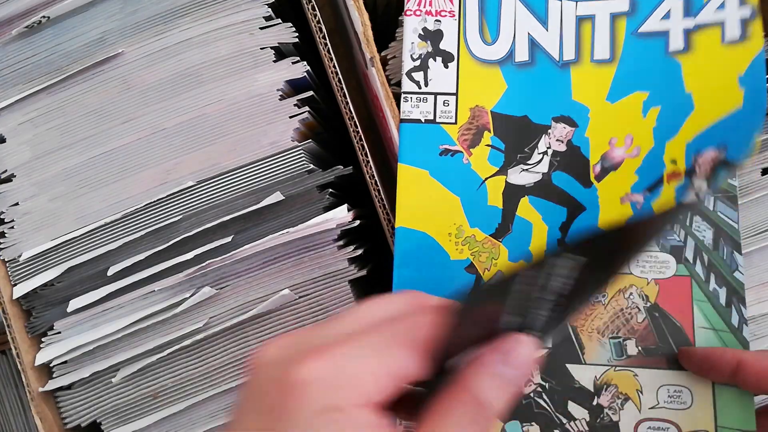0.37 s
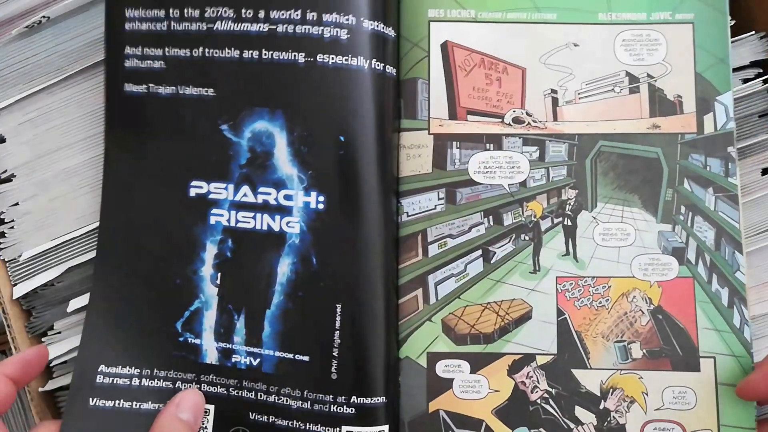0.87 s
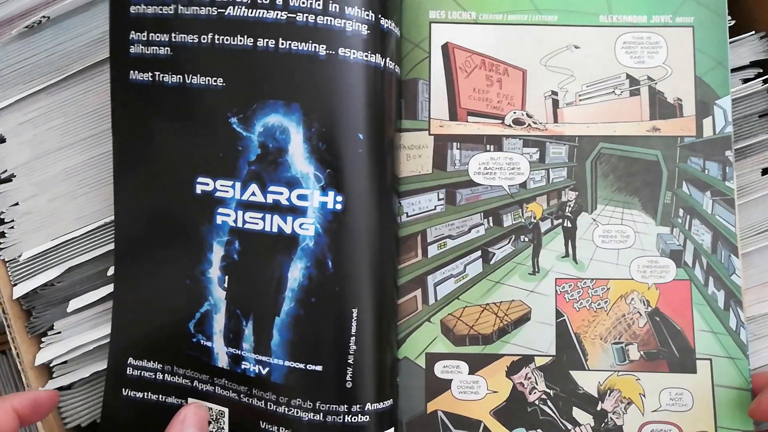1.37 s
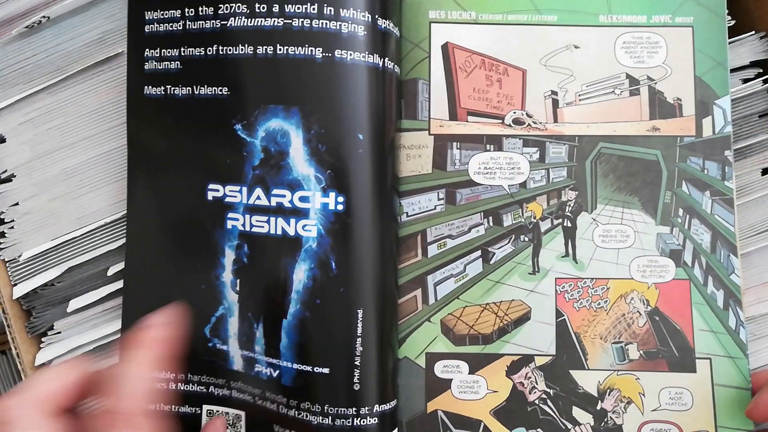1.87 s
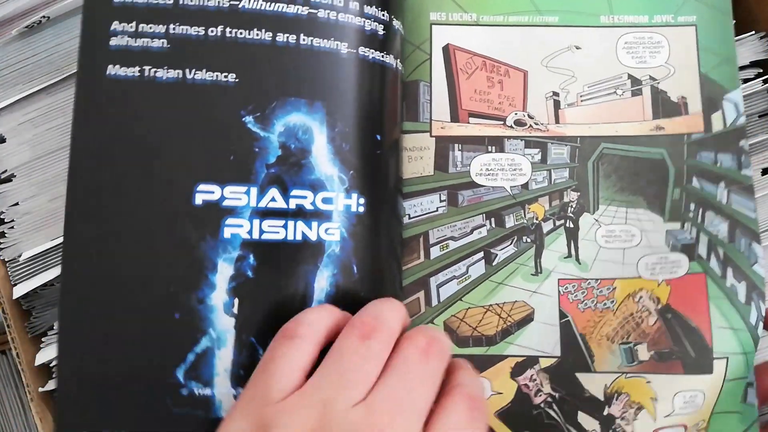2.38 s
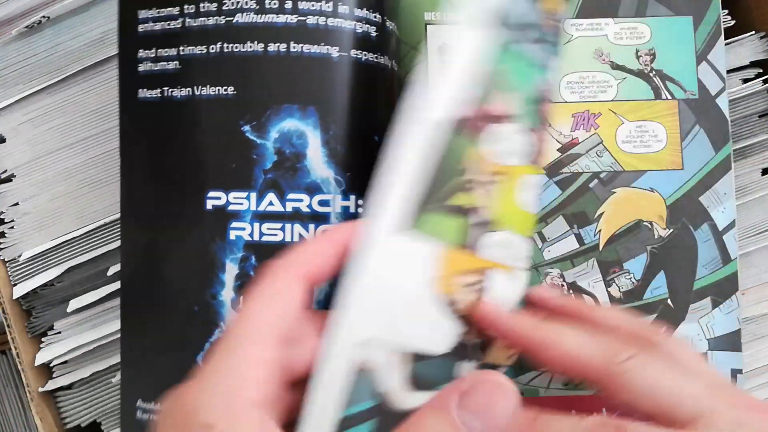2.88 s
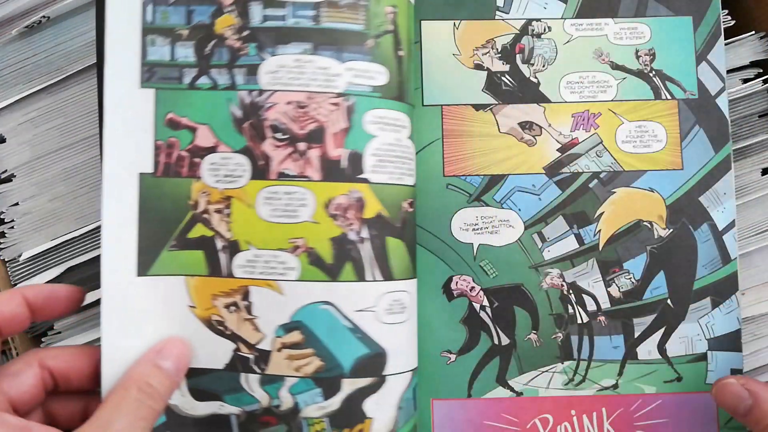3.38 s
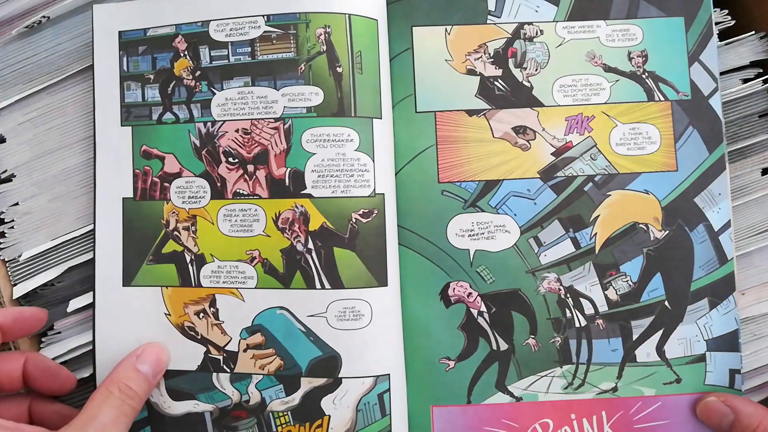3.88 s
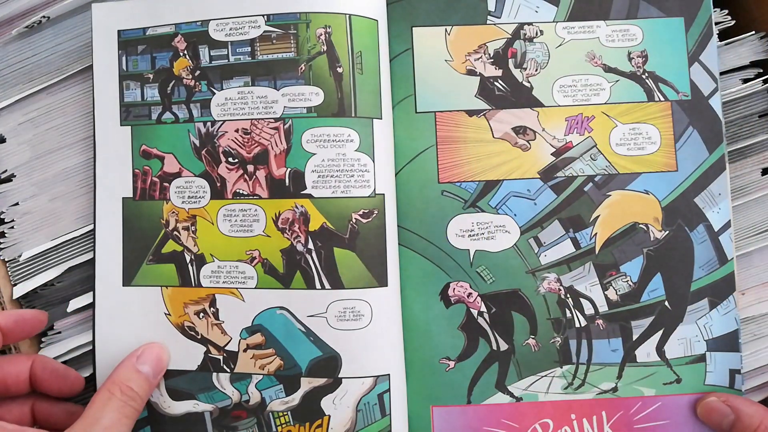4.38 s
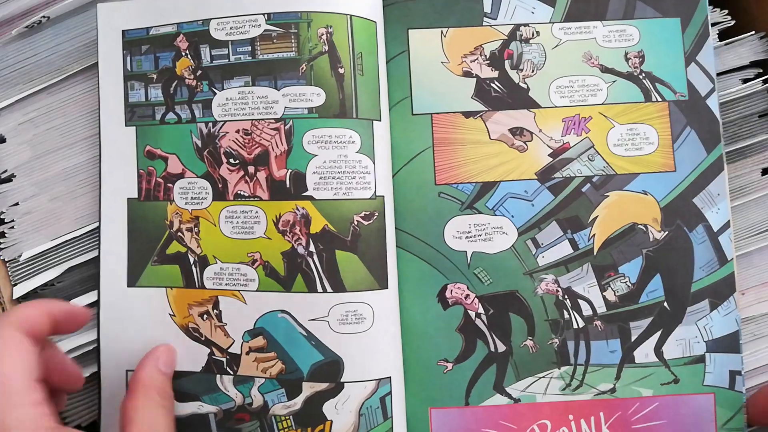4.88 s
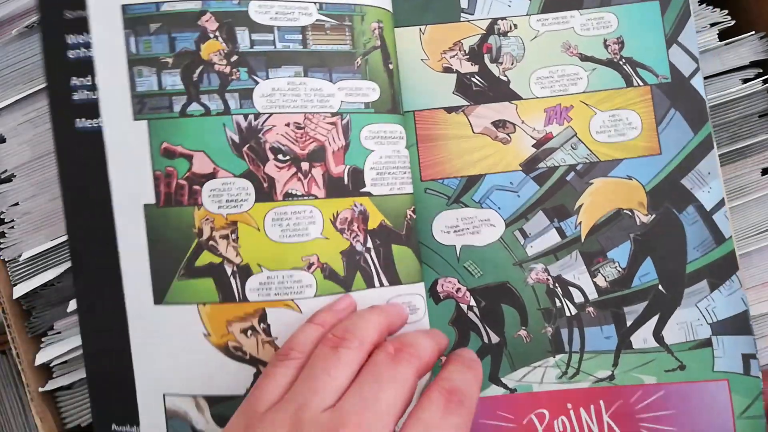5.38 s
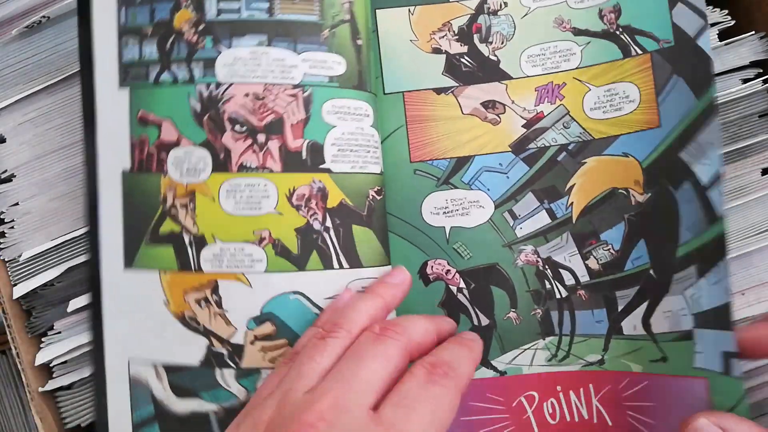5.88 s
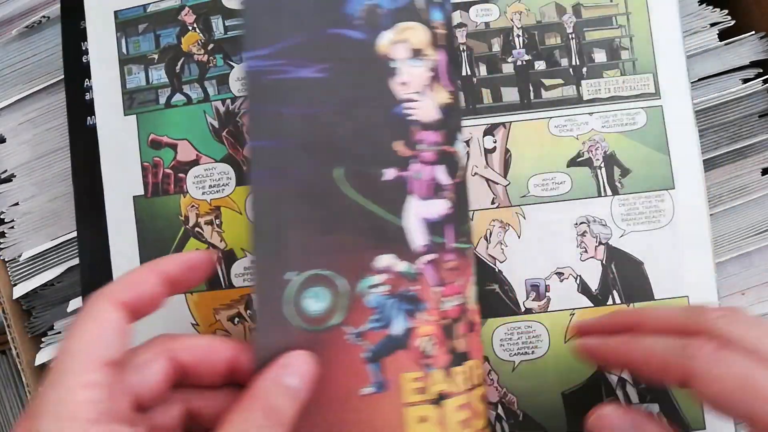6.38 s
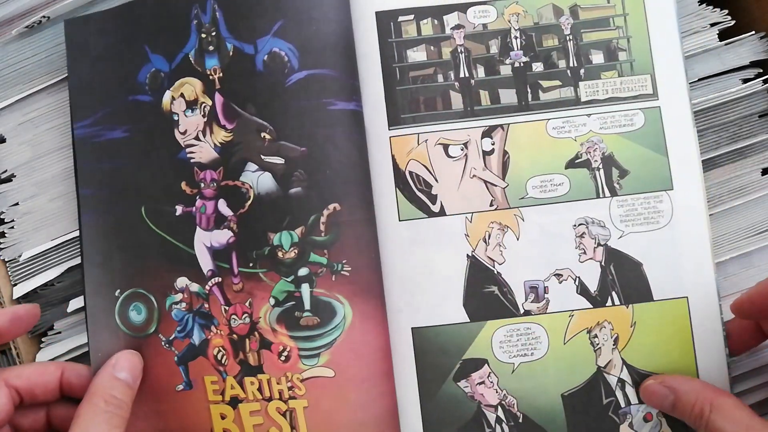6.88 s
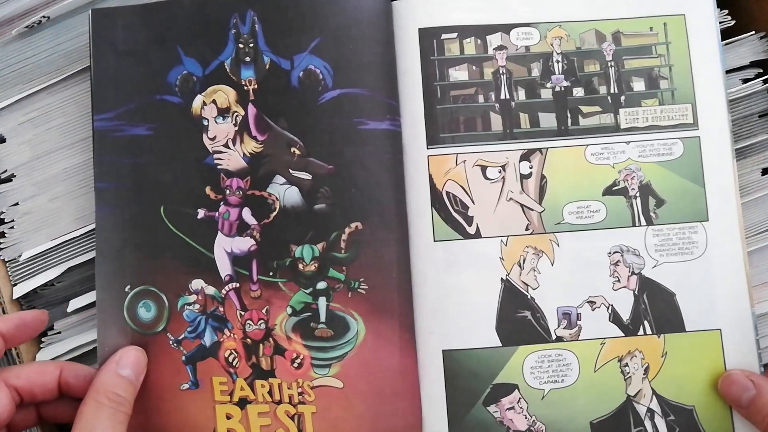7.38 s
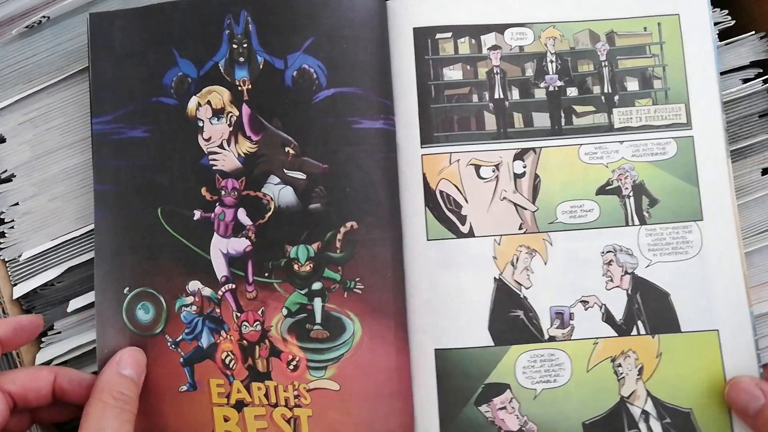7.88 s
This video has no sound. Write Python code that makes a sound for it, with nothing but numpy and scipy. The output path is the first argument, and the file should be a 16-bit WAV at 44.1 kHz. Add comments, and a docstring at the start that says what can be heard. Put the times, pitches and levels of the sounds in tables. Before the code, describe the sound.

Glossy booklet pages are turned by hand close up, with grainy rubbing, crisp creasing snaps and soft bumps, separated by quiet pauses.

```python
"""Paper and fingertips slide with a grainy hiss as hands turn the glossy pages of a thin booklet over a box
of magazines, close under a small stereo microphone. Friction is noise shaped by many tiny random catches.
Creases snap as short noise bursts in three bands, curled edges sing as noise in narrow gliding resonances,
and the booklet bumps the box, heard as decaying modes. A low handling rumble, a short room echo
and the faint steady hush of a quiet room lie around them."""
import sys
import numpy as np
from scipy import signal
from scipy.fft import rfft, irfft, next_fast_len
from scipy.io import wavfile
from scipy.ndimage import uniform_filter1d

SR = 44100
rng = np.random.default_rng(int(sys.argv[2]) if len(sys.argv) > 2 else 0)


def makeup_ratio(level_db):
    """Linear amplitude ratio for a level in decibels (20 dB per factor of ten)."""
    decades = np.asarray(level_db, float) / 20
    return 10 ** decades


def master_out(mix):
    """Clip the mix to full scale and print it as 16-bit PCM to the path in sys.argv[1]."""
    frames = np.transpose(np.atleast_2d(mix))
    ceiling = np.clip(frames, -1, 1)
    pcm = np.round(ceiling * 32767).astype(np.int16)
    wavfile.write(sys.argv[1], SR, pcm)


N = 363384  # samples, 8.24 s


def evened(x):
    """Power normalisation: scales to rms 1."""
    return x / np.sqrt(np.mean(x ** 2) + 1e-20)


def read(points, hz):
    """Logarithmic frequency scale: interpolates a table along it."""
    f, value = np.transpose(points)
    return np.interp(np.log(hz + 1), np.log(f + 1), value)


def coloured(x, tone):
    """Linear filtering: weights the spectrum by a table of levels, then sets the pair to rms 1."""
    size = next_fast_len(N)
    weight = makeup_ratio(read(tone, np.fft.rfftfreq(size, 1 / SR)))
    return evened(irfft(rfft(x, size) * weight, size)[..., :N])


def resonate(x, hz, width):
    """Resonance by heterodyning: shifts the curve hz down to zero, smooths twice, and shifts back."""
    turn = np.exp(2j * np.pi * np.cumsum(hz * np.ones(x.shape[-1])) / SR)
    r = np.exp(-np.pi * width / SR)
    smoothed = signal.lfilter([(1 - r) ** 2], [1, -2 * r, r * r], x / turn)
    return 2 * (turn * smoothed).real


def pair(x, same, lag):
    """Partial coherence: the right port hears a share of the left's sound, lag samples later, plus its own."""
    return np.array([x[0], same * np.roll(x[0], lag) + np.sqrt(1 - same ** 2) * x[1]])


def sides(pan_db):
    """Level difference between ports: left and right gains of constant mean power."""
    g = makeup_ratio([pan_db / 2, -pan_db / 2])
    return g / np.sqrt((g ** 2).mean(0))


def grit(per_s, spread_db, grain_s, smooth, same, lag):
    """Stick-slip friction: tiny catches of uneven size, each a short puff, over a smooth hiss."""
    catches = rng.random(N) < per_s / SR
    size = makeup_ratio(spread_db * np.minimum(rng.exponential(1, N), 5)) * catches
    puffs = signal.lfilter([1], [1, -np.exp(-1 / (grain_s * SR))], size)
    return pair((smooth + evened(puffs)) * rng.standard_normal((2, N)), same, lag)


def mottled(x, depth_db):
    """Changing contact: the colour shifts in random patches, as ever other parts of the sheet touch."""
    z = signal.stft(x, nperseg=256, noverlap=192)[2]
    patches = uniform_filter1d(rng.standard_normal(z.shape[1:]), size=5, axis=0)  # across frequency
    patches = uniform_filter1d(patches, size=24, axis=1)  # across time
    return evened(signal.istft(z * makeup_ratio(depth_db * evened(patches)), nperseg=256, noverlap=192)[1][:, :N])


def swells(peak_s, rise_s, fall_s, db, rest_db):
    """Incoherent addition: gains that rise to a peak and fall away, their powers added to a resting power."""
    t = np.arange(0, N + 32, 32)[:, None] / SR
    away = np.maximum((peak_s - t) / rise_s, (t - peak_s) / fall_s)
    rounded = 1.15  # 1 gives pointed swells, more gives round ones
    power = (makeup_ratio(db - 20 * away ** rounded) ** 2).sum(1) + makeup_ratio(rest_db) ** 2
    return np.interp(np.arange(N) / SR, t[:, 0], np.sqrt(power))


# strokes of finger and page:
# (peak time [s], rise by 20 dB [s], fall by 20 dB [s], rubbing level [dB], bent sheet re rubbing [dB])
STROKES = [(0.034, 0.129, 0.022, -47, 0.8), (0.06, 0.052, 0.165, -49.3, -3.5),
           (0.16, 0.1, 0.08, -45.0, -4.8), (0.225, 0.05, 0.1, -54, -3), (0.295, 0.075, 0.09, -40, -11),
           (0.35, 0.12, 0.075, -51, -3), (0.472, 0.054, 0.299, -50.1, -4.4),
           (0.64, 0.027, 0.067, -40.7, -5.8), (0.721, 0.062, 0.152, -50.9, -2.8),
           (0.9, 0.16, 0.268, -48.8, -2.7), (0.952, 0.004, 0.741, -59.4, -1.4),
           (1.16, 0.05, 0.02, -49.0, 0.0), (1.184, 0.005, 0.05, -46.0, 3.0),
           (1.846, 0.19, 0.258, -54.3, -5.0), (2.103, 0.064, 0.104, -56.7, -10.7),
           (2.22, 0.022, 0.245, -43.4, -3.8), (2.322, 0.066, 0.169, -34.5, -10.5),
           (2.472, 0.139, 0.11, -35.5, -6.2), (2.647, 0.004, 0.194, -43.4, -9.9),
           (2.693, 0.054, 0.066, -46.3, 8.2), (2.792, 0.108, 0.085, -51.2, -1.2),
           (2.925, 0.047, 0.274, -49.9, -8.4), (3.024, 0.097, 0.153, -46.3, -11.0),
           (3.113, 0.078, 0.138, -45.1, -5.7), (3.211, 0.108, 0.093, -53.1, -10.1),
           (3.348, 0.075, 0.14, -46.3, -9.5), (3.48, 0.015, 0.178, -61.1, -5.6),
           (3.63, 0.083, 0.055, -57.0, -2.3), (3.791, 0.12, 0.038, -48.3, -5.3),
           (4.664, 0.122, 0.111, -68.3, -0.7), (4.915, 0.072, 0.124, -56.7, -2.5),
           (5.038, 0.124, 0.016, -53.9, -5.8), (5.148, 0.582, 0.007, -61.2, -2.8),
           (5.198, 0.141, 0.163, -56.6, -4.1), (5.294, 0.064, 0.078, -38.7, -14.8),
           (5.431, 0.238, 0.069, -44.7, -3.9), (5.527, 0.022, 0.062, -39.1, -6.9),
           (5.578, 0.198, 0.035, -43.1, -1.2), (5.669, 0.161, 0.132, -33.6, -7.6),
           (5.714, 0.202, 0.026, -46.4, -20.8), (5.786, 0.021, 0.107, -37.4, -5.0),
           (5.91, 0.141, 0.177, -41.0, -6.3), (5.977, 0.042, 0.011, -41.5, -9.4),
           (6.114, 0.127, 0.084, -43.7, -10.3), (6.321, 0.227, 0.079, -50.2, -7.9),
           (6.347, 0.028, 0.013, -45.1, -17.1), (6.437, 0.028, 0.065, -58.5, -7.6),
           (6.538, 0.073, 0.041, -49.9, -9.4), (6.614, 0.007, 0.166, -53.0, -8.5),
           (6.655, 0.097, 0.099, -53.8, -7.1), (6.803, 0.145, 0.05, -55.0, -5.2),
           (6.878, 0.109, 0.044, -59.0, -1.2), (6.97, 0.07, 0.321, -53.6, -4.1),
           (7.109, 0.25, 0.256, -50.9, -4.5), (7.267, 0.39, 0.043, -58.4, -2.2),
           (7.467, 0.019, 0.64, -69.6, -2.1), (7.979, 0.218, 0.031, -56.0, -3.4),
           (8.038, 0.069, 0.062, -49.7, -6.8), (8.188, 0.082, 0.734, -63.3, -5.6)]
# where the hands work: (time [s], left over right level [dB], brightest frequency of the rub [Hz])
HAND_PATH = [(0.0, -9.0, 7000), (0.07, -5.5, 6960), (0.25, -10.5, 6830), (1.1, -1.0, 7090),
             (1.95, -2.0, 7110), (2.52, -10.0, 6970), (2.75, -2.5, 6640), (2.94, -11.0, 7340),
             (4.01, -0.5, 7070), (5.0, -3.5, 7030), (5.28, -11.5, 7430), (5.51, -4.5, 7020),
             (6.22, -7.5, 7450), (6.29, -11.5, 7360), (6.77, -3.0, 7120), (8.24, -3.0, 7150)]
# colour of the rubbing, peaked by the microphone port: (frequency [Hz], relative density [dB per Hz])
RUB_TONE = [(2650, -54), (4500, -18), (6120, -8), (7180, -7.5), (7900, -6), (10700, -23), (13700, -32),
            (16000, -40)]


def hand_curves():
    """Moving source: the hands' level difference and brightest frequency, interpolated over time."""
    s, *columns = np.transpose(HAND_PATH)
    return [np.interp(np.arange(N) / SR, s, column) for column in columns]


def rubbing():
    """Sliding friction: each stroke drives a grainy hiss with a moving resonance."""
    *when, rub_db, _ = np.transpose(STROKES)
    pan_db, bright_hz = hand_curves()
    hiss = coloured(grit(per_s=1500, spread_db=9.0, grain_s=0.0024, smooth=3.2, same=0.31, lag=-5), RUB_TONE)
    hiss = mottled(hiss + 0.9 * resonate(hiss, bright_hz, width=1640), depth_db=2.7)
    # at rest, fingers hold the pages still
    return swells(*when, rub_db, rest_db=-80) * sides(pan_db) * hiss


# colour of the bent sheet: (frequency [Hz], relative density [dB per Hz])
SHEET_TONE = [(1180, -31.5), (2000, -8.5), (2280, -5), (3090, -1), (3870, -1.5), (5500, -1), (7150, -12),
              (12100, -120)]


def bending():
    """Bending of a thin sheet: the same strokes drive its rustle, a friction noise of lower colour."""
    *when, rub_db, bend_db = np.transpose(STROKES)
    pan_db, _ = hand_curves()
    rustle = grit(per_s=1000, spread_db=1.0, grain_s=0.003, smooth=0.64, same=0.41, lag=11)
    sheet = mottled(coloured(rustle, SHEET_TONE), depth_db=1.36)
    return swells(*when, rub_db + bend_db, rest_db=-83) * sides(0.7 * pan_db) * sheet


# colour of the flexing page: (frequency [Hz], relative density [dB per Hz])
FLEX_TONE = [(260, -61), (450, -38), (599, -16), (1070, -6), (1570, -8), (2000, -6), (2280, -14),
             (2600, -10), (3380, -42), (5720, -120)]
# the page buckles and flaps: (peak time [s], rise by 20 dB [s], fall by 20 dB [s], level [dB])
FLAPS = [(0.012, 0.025, 0.255, -60.1), (0.177, 0.033, 0.574, -57.7), (0.633, 0.032, 0.19, -55.3),
         (0.798, 0.035, 0.091, -52.2), (0.917, 0.123, 0.133, -56.0), (1.18, 0.006, 0.047, -42.0),
         (2.1, 0.123, 0.047, -64.8), (2.205, 0.071, 0.021, -56.3), (2.519, 0.106, 0.089, -50.7),
         (2.689, 0.03, 0.062, -36.1), (2.789, 0.032, 0.046, -49.3), (2.915, 0.049, 0.381, -60.2),
         (3.084, 0.032, 0.126, -53.7), (3.572, 0.204, 0.688, -67.4), (3.828, 0.341, 0.029, -64.4),
         (5.072, 0.224, 0.041, -61.5), (5.129, 0.044, 0.039, -62.2), (5.405, 0.202, 0.172, -53.0),
         (5.531, 0.007, 0.521, -59.7), (5.878, 0.252, 0.026, -49.0), (6.008, 0.05, 0.023, -55.0),
         (6.193, 0.321, 0.06, -61.7), (6.323, 0.012, 0.296, -63.7), (7.145, 0.024, 0.267, -59.0),
         (7.248, 0.048, 0.031, -54.6), (8.045, 0.225, 0.117, -61.2)]


def flexing():
    """Flexure of a page: strokes and flaps add in power to drive a low, lumpy noise."""
    *when, rub_db, bend_db = np.transpose(STROKES)
    pan_db, _ = hand_curves()
    lumps = grit(per_s=250, spread_db=4.7, grain_s=0.0048, smooth=0.83, same=0.45, lag=2)
    flex = mottled(coloured(lumps, FLEX_TONE), depth_db=2.8)
    stroke_db = rub_db - 13 + 1.2 * np.minimum(bend_db, 0)  # a weaker bend flexes the page less
    level = np.hypot(swells(*when, stroke_db, rest_db=-85), swells(*np.transpose(FLAPS), rest_db=-85))
    return level * sides(0.24 * pan_db) * flex  # lower sound bends round to both ports


# the hand shifts the pile and fans air: (peak time [s], rise by 20 dB [s], fall by 20 dB [s], level [dB])
SHIFTS = [(0.68, 0.3, 1.0, -67), (1.84, 0.04, 0.16, -63), (2.12, 0.16, 0.14, -58), (2.55, 0.25, 0.6, -64),
          (2.74, 0.3, 0.1, -66), (3.14, 0.16, 0.11, -60), (3.72, 0.6, 0.12, -73), (5.09, 0.06, 0.06, -54),
          (5.28, 0.12, 0.28, -63), (5.85, 0.45, 0.35, -64), (6.34, 0.3, 0.4, -69), (7.16, 0.3, 0.4, -67),
          (7.26, 0.2, 0.05, -63), (7.99, 0.6, 0.6, -72)]
# colour of the rumble: (frequency [Hz], relative density [dB per Hz])
HANDLING_TONE = [(15, -56), (25, -2), (86, -1), (123, 0.5), (157, 2), (207, 0), (313, -4), (397, -7.5),
                 (600, -16.5), (780, -11), (1320, -120)]


def handling():
    """Long-wave coherence: a lumpy low rumble, nearly alike at both ports."""
    lumps = grit(per_s=66, spread_db=1.5, grain_s=0.0067, smooth=1.56, same=0.95, lag=0)
    return swells(*np.transpose(SHIFTS), rest_db=-78) * coloured(lumps, HANDLING_TONE)


# colour of the hush: (frequency [Hz], relative density [dB per Hz])
HUSH_TONE = [(15, -29), (25, -1.5), (85, -7.5), (130, -12.5), (350, -13.5), (600, -15), (1200, -16),
             (2200, -21), (3500, -17.5), (5500, -20), (7200, -24.5), (9500, -24.5), (15000, -29)]
# likeness of the hush at the two ports: (frequency [Hz], left-right correlation [-1 to 1])
HUSH_LIKENESS = [(30, 1), (90, 0.93), (150, 0.48), (300, -0.72), (620, -0.89), (1400, 0.33), (3000, -0.25),
                 (15000, -0.031)]


def hush():
    """Frequency-dependent coherence: steady room and microphone noise, most alike at both ports in the bass."""
    size = next_fast_len(N)
    left, other = rfft(rng.standard_normal((2, size)))
    same = np.clip(read(HUSH_LIKENESS, np.fft.rfftfreq(size, 1 / SR)), -1, 1)
    right = same * left + np.sqrt(1 - same ** 2) * other
    both = irfft(np.array([left, right]), size)[:, :N]
    return makeup_ratio(-67) * coloured(both, HUSH_TONE)


def room(x):
    """Exponential reverberant decay: sparse echoes of random sign, other ones for each port."""
    t60, length = 0.072, 12000  # s, samples
    n = np.arange(length)
    taps = rng.choice([-1., 1.], (2, length)) * (rng.random((2, length)) < .05)
    taps *= makeup_ratio(-60 * n / SR / t60) * (n > 150)  # the first echoes come after 3.4 ms
    return signal.oaconvolve(x, taps / np.linalg.norm(taps[0]), axes=1)[:, :N]


# the clearest creases that let go, peak levels before panning:
# (time [s], page body level [dB], middle band level [dB], crisp edge level [dB], unstretched crack length [ms])
SNAPS = [(0.0111, -52, -49, -46, 6.0), (0.0276, -41, -47, -40, 3.4), (0.0361, -44, -38, -31, 2.0),
         (0.155, -54, -47, -26, 2.3), (0.1667, -46, -36, -12, 2.2), (0.1799, -33, -24.5, -26, 4.2),
         (0.1959, -33.5, -44, -41, 3.1), (0.202, -37.5, -49, -52, 3.5), (0.2348, -40, -46, -51, 4.1),
         (0.62, -54, -53, -36, 9.1), (0.6452, -49, -40, -29, 1.3), (0.653, -47, -40, -32, 4.9),
         (0.672, -46, -53, -43, 2.9), (0.722, -48, -42, -30.5, 0.9), (0.7984, -43, -40, -47, 4.5),
         (0.8644, -49, -45, -46, 3.3), (0.8998, -42, -38, -47, 3), (1.1647, -45, -36, -32, 5.4),
         (1.1775, -36, -25, -28, 1.2), (1.1804, -30, -13, -19.5, 1.1), (1.1875, -42, -32, -46, 5.3),
         (1.802, -53, -57, -60, 2.9), (2.079, -39.5, -46, -43, 2.2), (2.189, -40, -59, -61, 6.1),
         (2.3241, -43, -26, -19, 2.8), (2.4256, -54, -37, -28, 2.7), (2.4502, -39.5, -39, -23, 1.3),
         (2.5206, -29, -30, -24.5, 1.9), (2.593, -47, -45, -43, 2.3), (2.6481, -33, -28, -15, 3.2),
         (2.6695, -36, -27, -33, 3.4), (2.6834, -48, -21, -37, 1.7), (2.6952, -43, -30, -34, 4.2),
         (2.703, -38, -28, -37, 2.7), (2.7167, -32, -26.5, -34, 5.2), (2.7843, -40, -37, -46, 4.8),
         (2.8886, -52, -61, -46, 1.5), (2.9058, -41.5, -60, -53, 1.1), (3.0865, -28.5, -41, -42, 2.5),
         (3.1593, -44, -51, -49, 6.1), (3.5754, -45, -52, -58, 1.6), (3.8144, -44, -45, -59.5, 1.8),
         (4.9576, -52.5, -56, -54, 2.7), (5.027, -44, -49, -57, 2.8), (5.0582, -45, -62, -67, 3.9),
         (5.1155, -43, -50, -57, 1.4), (5.135, -56, -53, -37.5, 5.2), (5.244, -49, -35, -32, 1.1),
         (5.3768, -23, -17, -18.5, 3.7), (5.535, -41.5, -35, -36, 8.2), (5.6432, -37, -40, -36, 3.8),
         (5.7327, -38, -38, -39, 3.3), (5.8341, -27, -33, -26, 1.5), (5.8618, -32, -25, -27, 2.4),
         (6.3168, -50, -51, -35.5, 6.1), (6.3971, -60, -72, -64, 4.8), (6.485, -53, -66, -56, 5.2),
         (6.5516, -50.5, -65, -62, 1.5), (6.6086, -66, -60, -50, 4), (6.7471, -54, -47, -55, 1.1),
         (7.135, -45, -53, -56, 1.7), (7.1499, -47, -49, -52, 4), (7.236, -51.5, -51, -49, 1.6),
         (7.19, -38.5, -41, -39, 1.1), (7.2558, -44.5, -47, -47, 1.5), (7.9729, -43.5, -39.5, -57, 1.1)]
# page body, middle band, crisp edge:
# (centre [Hz], resonator width [Hz], stretch of the crack length [factor], t60 of the shiver [s])
SNAP_BANDS = [(1296, 1310, 1.37, 0.047), (3500, 3250, 0.87, 0.02), (6880, 2430, 1.4, 0.01)]


def snaps():
    """Impulsive release of strain: a crack of milliseconds, then a weak shiver, longest in the page body."""
    length = 4000
    out, t = np.zeros((2, N + length)), np.arange(length) / SR
    when, pan_db, _ = np.transpose(HAND_PATH)
    for s, *band_db, crack_ms in SNAPS:
        noise = pair(rng.standard_normal((2, length)), 0.53, lag=int(rng.integers(-12, 13)))
        # the crease lets go with one sharp click, at its own instant for each port
        click = rng.integers(0, 13, (2, 1)) == np.arange(13)
        noise[:, 14:27] += 3.0 * rng.choice([-1, 1]) * click
        # the higher the band, the more it leans to one side
        for db, (hz, width, stretch, t60), aimed in zip(band_db, SNAP_BANDS, (0.2, 0.4, 1.1)):
            burst = np.exp(-(1000 * t / (stretch * crack_ms)) ** 2)
            shiver = makeup_ratio(-7 - 60 * t / t60)
            shape = (1 - np.exp(-t / 0.00034)) * (burst + shiver)
            crack = resonate(resonate(noise * shape, hz, width), hz, 2 * width)
            crack = crack / abs(crack).max(1)[:, None]
            side = sides(aimed * np.interp(s, when, pan_db))[:, None]
            out[:, round(s * SR):][:, :length] += makeup_ratio(db) * side * crack
    return out[:, :N]


# the booklet bumps the box; all levels add to those of the modes:
# (time [s], level [dB], extra for the lowest mode [dB], extra for the three upper modes [dB])
BUMPS = [(0.167, -54, -8, -3), (0.552, -53, -5, -17), (0.674, -54, -7, 2.5), (0.708, -48, -16, -7),
         (0.804, -49, -21, -1.5), (0.894, -45, -22, -5.5), (1.004, -54, -24, -4.5), (1.176, -45, -31, -13),
         (1.804, -42.5, -33, -12), (2.039, -51, -10, -8), (2.077, -48, -12, -3), (2.093, -44, -11, -4),
         (2.16, -53, -17, 4), (2.193, -45, -28, -3), (2.224, -45, -33, -10), (2.519, -32, -30, -11),
         (2.544, -40.5, -7, -13.5), (2.692, -41, -13, -4), (3.096, -47, -14, -6),
         (3.152, -44.5, -23, -11.5), (3.552, -54, -17, -15), (5.057, -45, -12, -7), (5.083, -54, 3, -17),
         (5.117, -49, -6, -3.5), (5.272, -47.5, -3, -11), (5.289, -50, -14, -11), (5.305, -56, -16, -13),
         (5.53, -53.5, -33, 5.5), (5.63, -54, -23, 3), (5.698, -52, -9, -3), (5.831, -35.5, -9.5, -4),
         (5.861, -43.5, -4, -19), (5.878, -48.5, -10.5, -4), (6.313, -53, -9, -17), (7.018, -52, -8, -10),
         (7.13, -53.5, -4, -2), (7.232, -46, -12, -7.5), (7.941, -53.5, -9, -16)]
# modes of the hollow box: (mean frequency before random spread [Hz], level [dB], t60 [s])
BOX_MODES = [(121.5, 4, 0.15), (211.1, -2.5, 0.11), (315, 0, 0.072), (483, -6.5, 0.071), (690, 6, 0.023)]


def bumps():
    """Modal decay: a soft push sets the hollow box thudding; the upper modes give a papery knock."""
    length = 12000
    out, t = np.zeros((2, N + length)), np.arange(length) / SR
    for s, bump_db, low_db, upper_db in BUMPS:
        extra_db = (low_db, 0, upper_db, upper_db, upper_db)
        for share_db, (hz, db, t60) in zip(extra_db, BOX_MODES):
            lead_s = np.array([[0], [.0002]])  # reaches the right port first
            turn = 2 * np.pi * hz * (rng.uniform(0.864, 1.167) * t + lead_s)
            ring = np.sin(turn) * (1 - np.exp(-t * hz * 3.4))
            out[:, round(s * SR):][:, :length] += makeup_ratio(bump_db + share_db + db - 60 * t / t60) * ring
    return out[:, :N]


# a curled page edge sings while it drags, levels before the fades:
# (start [s], end [s], level [dB], first frequency [Hz], last frequency [Hz])
SINGS = [(0.85, 1.02, -57.5, 3420, 3650), (2.242, 2.35, -50, 3360, 2070), (3.466, 3.508, -55, 3720, 3870),
         (3.581, 3.659, -56, 4300, 4160), (5.524, 5.7, -48, 3150, 2480), (5.857, 5.95, -53.5, 1030, 1070),
         (5.97, 6.174, -62.5, 1140, 1320), (6.157, 6.45, -68, 1300, 1180), (6.47, 6.57, -71.5, 1200, 1300),
         (6.75, 6.82, -57.5, 3900, 4230), (6.927, 7.0, -60, 3070, 3020)]


def singing():
    """Friction-driven resonance: noise in one narrow, gliding band, fading in and out."""
    out = np.zeros((2, N))
    drive = grit(per_s=1200, spread_db=1.6, grain_s=.001, smooth=2.2, same=0.2, lag=7)
    for start, end, db, from_hz, to_hz in SINGS:
        at = np.arange(round(start * SR), round(end * SR))
        glide_hz = np.linspace(from_hz, to_hz, len(at))
        ring = evened(resonate(drive[:, at], glide_hz, 0.19 * from_hz))
        out[:, at] += makeup_ratio(db) * signal.windows.tukey(len(at), .6) * ring
    return out


def scene():
    """Superposition: paper close by with a little room, over bumps, rumble and hush."""
    paper = rubbing() + bending() + flexing() + singing() + snaps()
    return paper + makeup_ratio(-13) * room(paper) + bumps() + handling() + hush()


def roll_off(x):
    """The treble ends steeply here."""
    return signal.sosfilt(signal.butter(12, 16430, fs=SR, output="sos"), x)


def record(dry):
    """Band limitation: a linear-phase low-pass at 15780 Hz."""
    low_pass = signal.firwin(511, 15780, window=("kaiser", 9), fs=SR)
    limited = signal.oaconvolve(dry, low_pass[None], "same")
    return roll_off(limited)


dry = scene()
out = record(dry)
master_out(out)
```